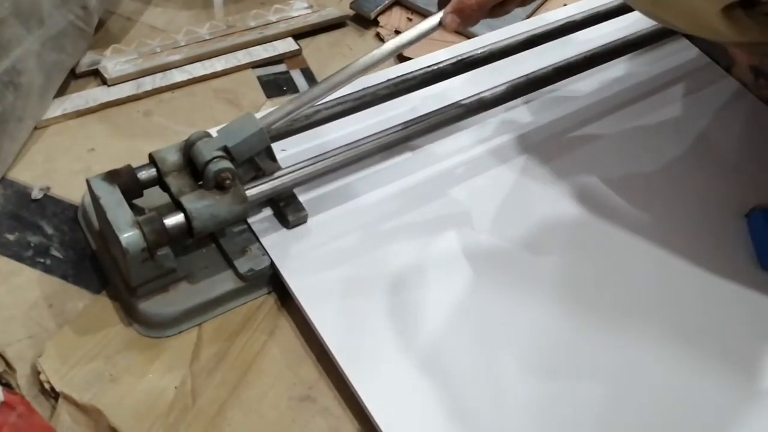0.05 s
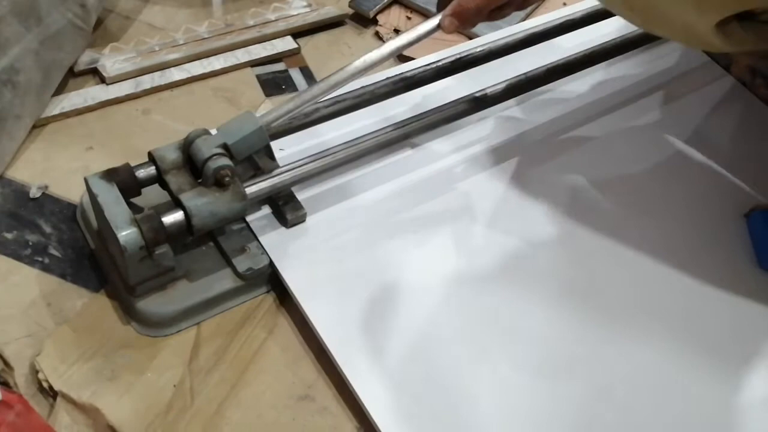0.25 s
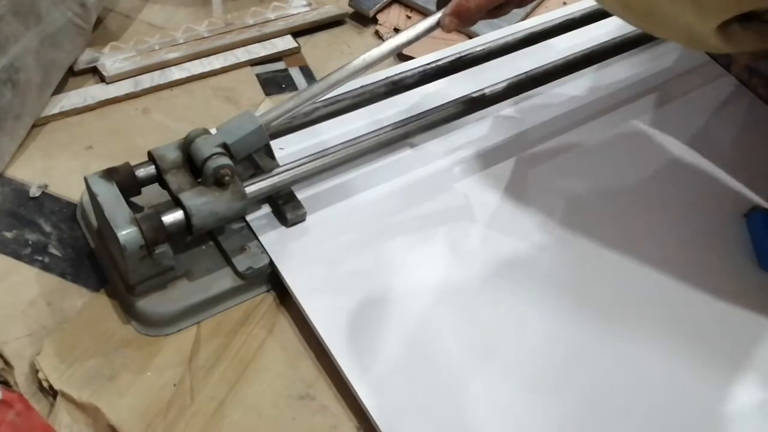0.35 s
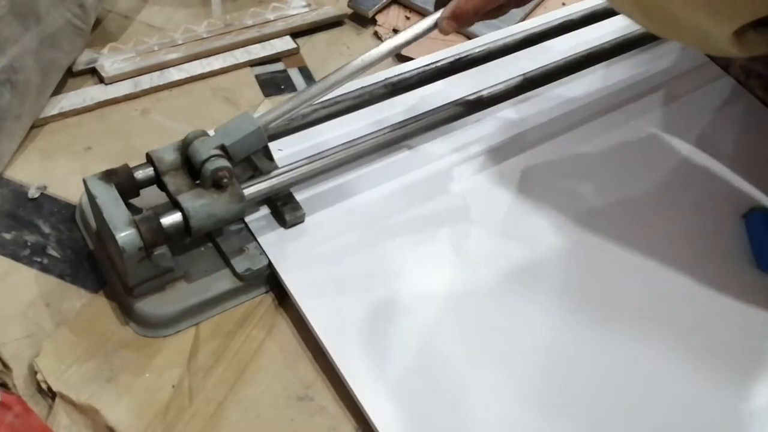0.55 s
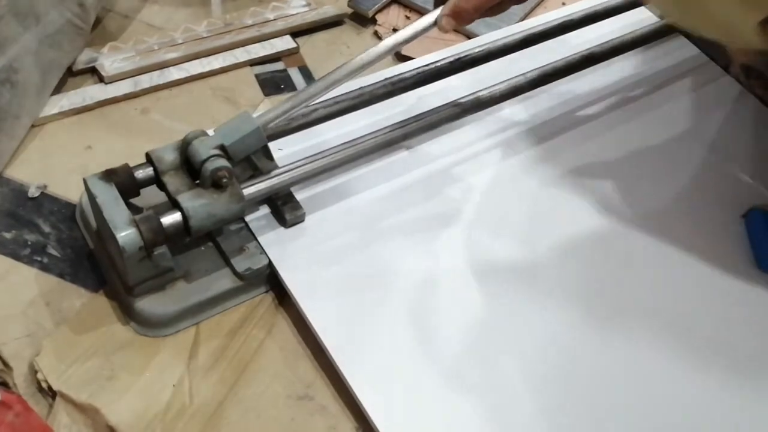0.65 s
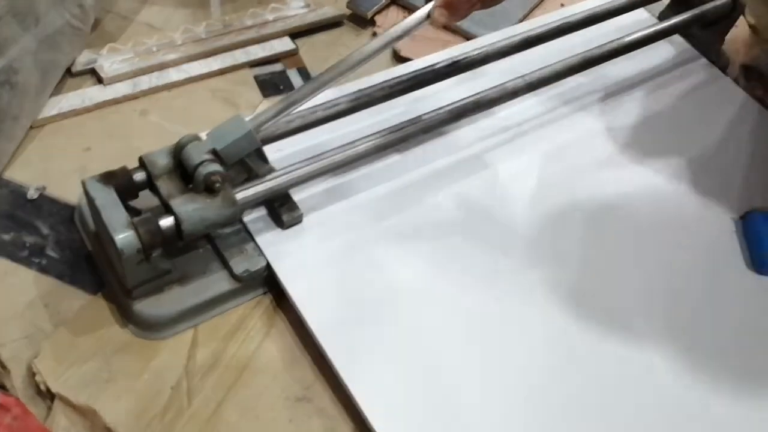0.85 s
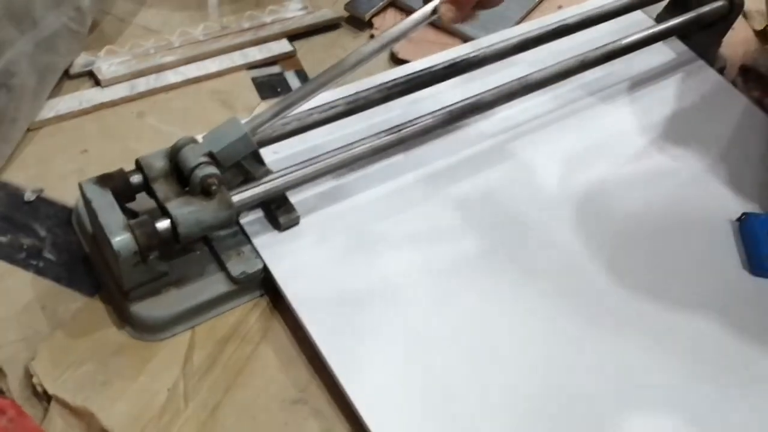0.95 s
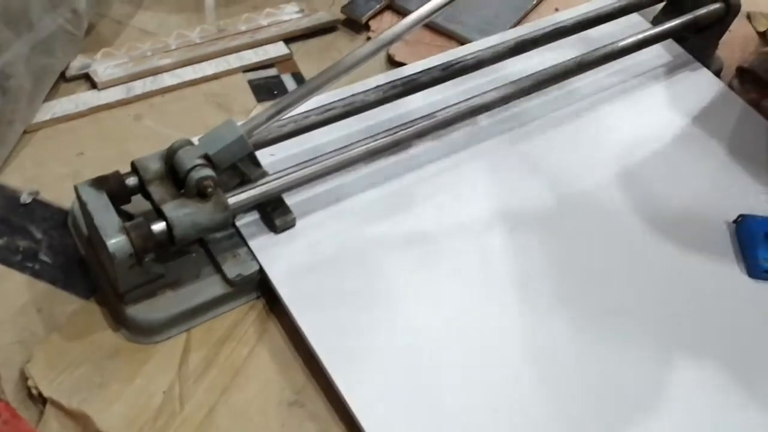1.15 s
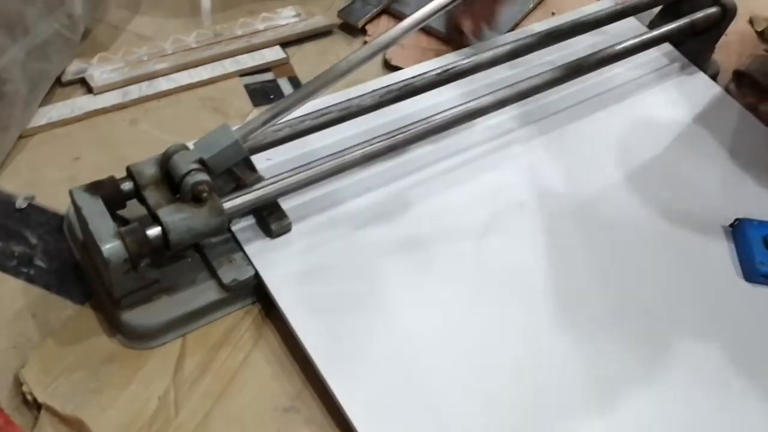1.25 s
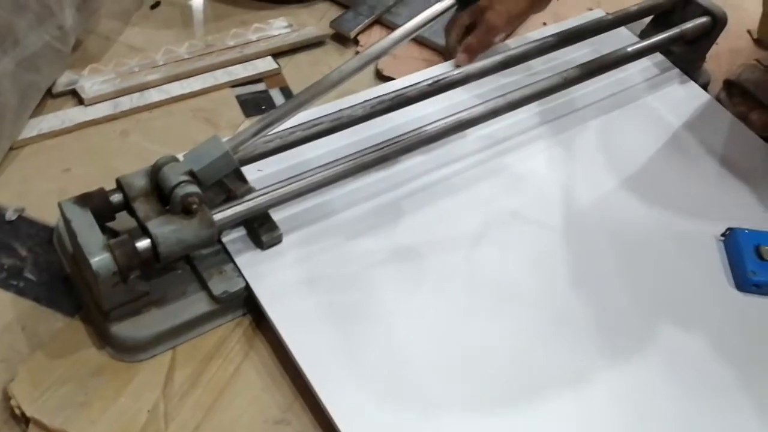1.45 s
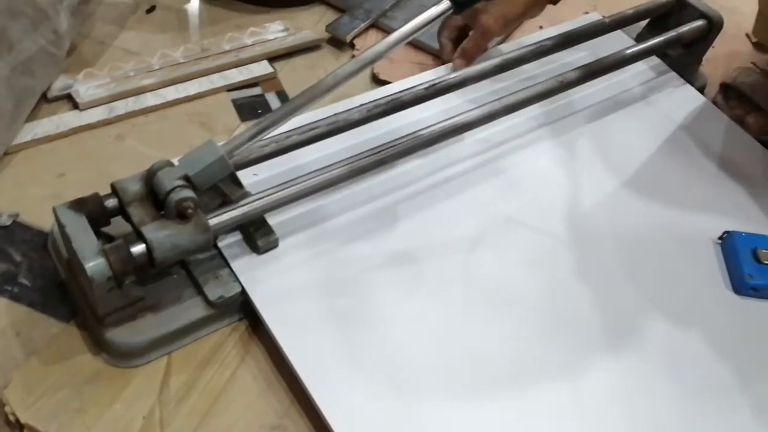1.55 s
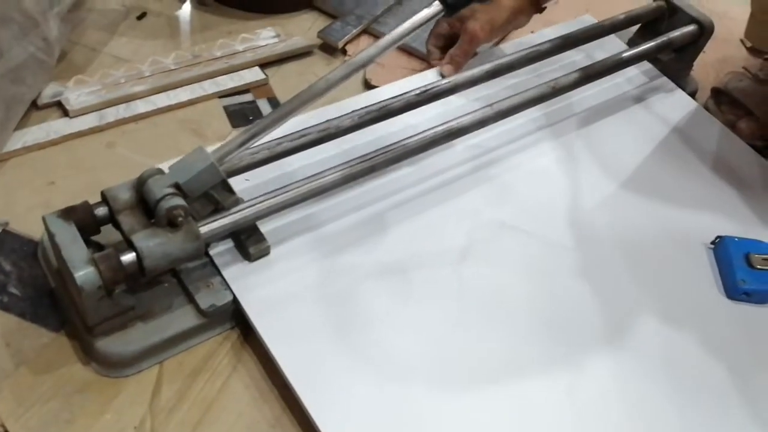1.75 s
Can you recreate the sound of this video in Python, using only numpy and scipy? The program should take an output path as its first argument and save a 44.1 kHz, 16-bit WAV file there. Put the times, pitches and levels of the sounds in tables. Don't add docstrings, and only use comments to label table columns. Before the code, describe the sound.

Close up, a manual tile cutter's handle clacks down with a short metallic ring, then the carriage scrapes and rattles along steel rails; the tile knocks, a distant tool clinks, in a small hissy room.

```python
import sys
import numpy as np
from scipy import signal
from scipy.fft import rfft, irfft, next_fast_len
from scipy.io import wavfile
from scipy.ndimage import uniform_filter1d

SR = 44100
rng = np.random.default_rng(int(sys.argv[2]) if len(sys.argv) > 2 else 0)


def generate_wav(signal):
    frames = np.transpose(np.atleast_2d(signal))
    scaled = np.clip(frames, -1, 1) * 32767
    pcm = np.round(scaled).astype(np.int16)
    wavfile.write(sys.argv[1], SR, pcm)


def invert_db(level):
    return 10 ** (np.asarray(level, dtype=float) / 20)


N = 79380
TIME = np.arange(N) / SR


def unit(x):
    return x / np.sqrt(np.mean(x ** 2) + 1e-20)


def noise():
    return rng.standard_normal((2, N))


def track(points):
    return np.interp(TIME, *np.transpose(points))


def along(points, hz):
    f, v = np.transpose(points)
    return np.interp(np.log(hz + 1), np.log(f + 1), v)


def filtered(x, response):
    m = 2 * next_fast_len(N // 2 + SR // 4)
    return irfft(rfft(x, m) * response(np.fft.rfftfreq(m, 1 / SR)), m)[..., :N]


def causal(points, hz):
    cepstrum = irfft(np.log(invert_db(along(points, hz))))
    cepstrum[1:len(hz) - 1] *= 2
    cepstrum[len(hz):] = 0
    return np.exp(rfft(cepstrum))


def body(peaks, ring_db, tone):
    def response(f):
        h = causal(tone, f)
        for k, (centre, width, db) in enumerate(peaks):
            resonance = 1j * f * width / (centre * centre - f * f + 1j * f * width)
            h = h + (-1) ** k * invert_db(db + ring_db) * resonance
        return h / np.sqrt(np.mean(abs(h) ** 2))
    return response


def burst(rows, lag=0):
    out, t = np.zeros(N + SR // 4), np.arange(SR // 4) / SR
    for s, db, t60, rise in rows:
        start = round(s * SR)
        out[start:start + len(t)] += (1 - np.exp(-t / (rise + lag))) * invert_db(db - 60 * t / t60)
    return out[:N]


def ring(modes, blows, rise):
    out = np.zeros(N)
    for s, blow_db in blows:
        t = np.maximum(TIME - s, 0)
        swell = 1 - np.exp(-t / rise)
        for hz, db, t60 in modes:
            out += swell * invert_db(db + blow_db - 60 * t / t60) * np.sin(2 * np.pi * hz * t)
    return out * np.array([[1], [.3]])


def ports(pair, alike):
    def mid_side(hz):
        turn = np.arccos(np.clip(along(alike, hz), -1, 1)) / 2
        return np.array([np.cos(turn), np.sin(turn)])
    mid, side = filtered(pair, mid_side)
    return np.array([mid + side, mid - side])


# (frequency [Hz], level [dB])
HISS_TONE = [(25, 2), (90, 4.5), (300, -3), (1200, -9), (4000, -4.5), (9500, -7), (13000, -16),
             (14800, -13)]
# (frequency [Hz], likeness [0-1])
HISS_ALIKE = [(60, 0.21), (300, 0.43), (640, 0.66), (1400, 0.0083)]
HISS_DB, HISS_PATCH_DB = -62, 4.5


def hiss():
    z = signal.stft(noise(), nperseg=512)[2]
    patches = uniform_filter1d(uniform_filter1d(rng.standard_normal(z.shape[1:]), 8, 0), 10, 1)
    pair = signal.istft(z * invert_db(HISS_PATCH_DB * unit(patches)), nperseg=512)[1][:, :N]
    coloured = filtered(pair, lambda hz: invert_db(along(HISS_TONE, hz)))
    return invert_db(HISS_DB) * unit(ports(coloured, HISS_ALIKE))


# (time [s], grit [dB], tile over grit [dB], bench over grit [dB])
SLIDE = [(0, -69.5, -0.5, -18), (.12, -69.5, -1.5, -1), (0.208, -53, -31, -25), (.235, -94, -29, -21),
         (0.268, -41.5, 6.5, 0), (0.498, -62, 10, 7), (0.561, -44.5, -7.5, -5.5), (0.681, -39.5, -2.5, -7),
         (0.714, -42, -14, -18), (0.852, -34, -13.5, -23.5), (0.936, -42, -5, -23), (1.07, -64.5, -2, -7.5),
         (1.13, -72.5, 12, 17.5), (1.3, -74, -1, 2.5), (1.649, -96.5, 30, 26.5), (1.718, -49.5, -1, -17),
         (1.762, -69.5, -5, -5), (1.8, -36.5, -10, -15.5)]


def sliding():
    s, grit_db, tile_db, bench_db = np.transpose(SLIDE)
    levels = [grit_db, grit_db + tile_db, grit_db + bench_db]
    return [invert_db(np.interp(TIME, s, db)) for db in levels]


def grit():
    grains_per_s, spread_db, share = 2500, 3, .6
    size = invert_db(spread_db * np.minimum(rng.exponential(1, N), 3))
    grains = (rng.random(N) < grains_per_s / SR) * size * noise()
    return unit(share * unit(grains) + (1 - share) * noise())


# (time [s], level [dB], t60 [s], rise [s])
CHATTER = [(.1825, -67, 0.028, .0005), (.195, -54, 0.013, 0.00035), (.5162, -38.5, 0.018, 0.00084),
           (.5287, -39.5, 0.033, 0.00036), (.5487, -34, 0.068, 0.00039), (.7172, -26.5, 0.027, 0.00022),
           (.7293, -21.5, 0.016, 0.00084), (.7322, -29, 0.008, 0.00046), (.7428, -25, 0.094, 0.00036),
           (.753, -29.5, 0.042, 0.00031), (.779, -35.5, 0.077, 0.0005), (.786, -28.5, 0.032, 0.00071),
           (.7931, -26, 0.14, 0.00015), (.804, -33, 0.027, 0.00096), (.812, -28, 0.06, 0.0011),
           (.818, -36, 0.036, 0.00052), (.9722, -39.5, 0.073, 0.00062), (1.6556, -44.5, 0.016, 0.00039),
           (1.6716, -41, 0.11, 0.00015), (1.763, -40, .1, 0.0021), (1.7734, -36, 0.055, 0.0037),
           (1.786, -34, 0.13, 0.0038)]
# (time [s], steel [dB], tile over steel [dB], bench over steel [dB], t60 [s])
KNOCKS = [
    (0.2328, -20, -14, -10, 0.08),
    (0.5658, -37, 3, 2, 0.053),
    (0.6235, -34, -2, -2, 0.053),
    (1.095, -64, 16, 26, 0.08),
    (1.1052, -52, 5, -5, 0.12),
    (1.6965, -35, 1, -29, 0.04),
    (1.711, -40, -10, -25, 0.028),
]
KNOCK_RISE_S, CHATTER_TILE_DB = 0.00035, -12.5
TILE_LAG_S, BENCH_LAG_S = 0.00034, 0.0037


def contacts():
    steel = burst(CHATTER + [(s, db, t60, KNOCK_RISE_S) for s, db, _, _, t60 in KNOCKS])
    tile_knocks = burst([(s, db + up, t60, 0) for s, db, up, _, t60 in KNOCKS], TILE_LAG_S)
    tile_chatter = invert_db(CHATTER_TILE_DB) * burst(CHATTER, TILE_LAG_S)
    bench_knocks = burst([(s, db + up, t60, 0) for s, db, _, up, t60 in KNOCKS], BENCH_LAG_S)
    return steel, tile_knocks + tile_chatter, bench_knocks


# (frequency [Hz], width [Hz], level [dB])
RAILS_NEAR = [(1174, 15, -3.5), (2020, 20, -5), (2830, 87, -3), (3288, 51, 3), (4880, 150, -13.5),
              (5350, 145, -3), (5800, 30, -7), (6850, 80, -1.5), (7070, 63, -13), (8600, 53, -29),
              (8880, 52, -4), (10100, 55, -1)]
RAILS_MID = [(720, 52, -7), (1980, 50, -17), (2503, 25, -4), (3317, 66, 4.5), (4140, 69, -11),
             (4860, 23, -1), (5500, 380, -13.5), (6315, 61, 0.5), (6590, 22, -3.5), (7300, 130, -0.5),
             (8020, 37, -22), (8700, 113, 4), (9680, 370, -11), (10350, 34, -24)]
RAILS_FAR = [(746, 36, -10), (1159, 34, 1.5), (2760, 26, 7), (4240, 71, -4.5), (5343, 77, -0.5),
             (6260, 70, 2), (6570, 57, -9), (6630, 53, -1), (8210, 43, -22), (8570, 105, -1),
             (9350, 46, -6), (9900, 43, 1)]
# (frequency [Hz], level [dB])
STEEL_TONE = [(300, -30.5), (900, -9.5), (1450, -6), (2500, 1.5), (4000, -5.5), (9500, -0.5), (12500, -7.5),
              (15000, -10)]
# (time [s], place [0 near, 1 mid, 2 far])
TRAVEL = [(.7, 0), (.73, 1), (.835, 1), (.865, 2), (1.3, 2), (1.5, 1)]
RAIL_RING_DB = 8.5


def rails(shake):
    place, out = track(TRAVEL), 0
    for k, peaks in enumerate([RAILS_NEAR, RAILS_MID, RAILS_FAR]):
        share = np.maximum(1 - abs(place - k), 0)
        out = out + filtered(share * shake, body(peaks, RAIL_RING_DB, STEEL_TONE))
    return out


# (frequency [Hz], width [Hz], level [dB])
TILE = [(556.7, 30.6, 2.5), (653, 60, -1.5), (871, 52, -19), (1094, 51, -2.5), (1193, 108, -1.5),
        (1707, 50, -2), (1970, 153, -8.5), (2594, 16, -2.5)]
# (frequency [Hz], level [dB])
TILE_TONE = [(200, -52.5), (450, -25), (700, -5.5), (1100, -14), (1450, -36), (2500, -15.5), (6000, -28),
             (8000, -70)]


def tile(shake):
    return filtered(shake, body(TILE, -5, TILE_TONE))


# (frequency [Hz], width [Hz], level [dB])
BENCH = [(116, 28, -23.5), (214, 10, -10), (282.5, 76, 0.5), (314, 5.4, 3.5), (363, 36, -6.5),
         (442, 17, -9)]
# (frequency [Hz], level [dB])
BENCH_TONE = [(20, -38), (60, -32), (150, -22), (300, -10), (500, -12), (900, -45)]


def bench(shake):
    return filtered(shake, body(BENCH, -4.5, BENCH_TONE))


def cutter():
    rail_slide, tile_slide, bench_slide = sliding()
    rail_hits, tile_hits, bench_hits = contacts()
    on_rails = rails(rail_slide * grit() + rail_hits * noise())
    on_tile = tile(tile_slide * grit() + tile_hits * noise())
    return on_rails + on_tile + bench((bench_slide + bench_hits) * noise())


# (offset [s], level [dB])
TICK_GROUP = [
    (-.0065, -1),
    (0, 1),
    (.0045, -1),
]
# (time [s], level [dB])
EXTRA_TICKS = [(0.0177, 16.5), (.019, 10), (.040, 9.5), (.042, 4), (.045, 6), (1.299, 2), (1.323, 3),
               (1.328, 0), (1.403, 12), (1.447, 11.5)]
# (frequency [Hz], level [dB])
TICK_TONE = [(4000, -30), (6000, -12), (9000, -1), (13000, -2), (15500, -8)]
TICK_S, TICK_PERIOD_S, TICK_DB, TICK_T60_S, TICK_RISE_S = .0045, .08, -51, .006, .0004


def ticks():
    steady = [(TICK_S + TICK_PERIOD_S * k + offset, db) for k in range(23) for offset, db in TICK_GROUP]
    rows = [(s, TICK_DB + db, TICK_T60_S, TICK_RISE_S) for s, db in steady + EXTRA_TICKS if 0 < s < N / SR]
    tick = filtered(burst(rows) * rng.standard_normal(N), lambda f: causal(TICK_TONE, f))
    return tick * np.array([[2], [1]])


# (time [s], level [dB])
RUMBLE = [(.22, -80), (0.249, -46.5), (.4, -62.5), (.47, -53.5), (.55, -60), (.7, -72), (.76, -87)]
# (frequency [Hz], level [dB])
RUMBLE_TONE = [(15, -30), (35, -16), (65, -13), (110, -7), (170, -10), (300, -60)]


def rumble():
    low = unit(filtered(rng.standard_normal(N), lambda f: invert_db(along(RUMBLE_TONE, f))))
    return invert_db(track(RUMBLE)) * low


# (time [s], level [dB], t60 [s], rise [s])
CRACK = (.2328, -13, .008, .0004)
# (frequency [Hz], level [dB])
CRACK_TONE = [(500, -18), (3000, -8), (5300, -1), (7000, -12), (15000, -16)]


def crack():
    return filtered(burst([CRACK]) * noise(), lambda f: causal(CRACK_TONE, f))


# (frequency [Hz], peak [dB], t60 [s])
BED = [(305, -19, .12), (532, -13, .09), (562, -13, .09), (1015, -23, .08), (1130, -13, .05),
       (1195, -11, .045), (1640, -19, .08), (2030, -24, .07), (2090, -26, .07), (2535, -27, .07),
       (3160, -26, .07), (5590, -26, .08)]
# (frequency [Hz], peak [dB], t60 [s])
FRAME = [(181.7, -39.5, 0.97), (547.5, -37.5, 0.75), (1006, -42, 1)]
# (frequency [Hz], peak [dB], t60 [s])
HANDLE = [(5280, -11, .014)]


def bed():
    blow = [(CRACK[0], 0)]
    return ring(BED + FRAME, blow, .005) + ring(HANDLE, blow, .0007)


JOLT_RISE_S = 0.0011
# (frequency [Hz], peak [dB], t60 [s])
TILE_DROP = [(213, -41, .14), (275, -43, .12), (525, -36, .12), (640, -35, .12), (1188, -47, .1)]
# (time [s], level [dB])
TILE_DROPS = [
    (0.5675, 1.5),
    (.577, -13),
    (1.0963, -11.5),
    (1.1, -0.5),
    (1.1068, -2.5),
]


def loose_tile():
    return ring(TILE_DROP, TILE_DROPS, JOLT_RISE_S)


# (frequency [Hz], peak [dB], t60 [s])
CARRIAGE = [(2537, -34, 0.054), (3384, -45, 0.16), (3286, -38, 0.088), (5640, -51, 0.19), (6087, -43.5, .1),
            (8646, -45, 0.066), (9342, -46, 0.067), (9970, -50, 0.19)]
# (time [s], level [dB])
CARRIAGE_JOLTS = [
    (1.06, -11),
    (1.1045, 1.5),
    (0.88, 8),
]


def carriage():
    return ring(CARRIAGE, CARRIAGE_JOLTS, JOLT_RISE_S)


# (frequency [Hz], level [dB], build-up [s], t60 [s])
CLINK = [(700, -56, .03, .06), (781, -49, .025, .07), (947, -50, .012, .05), (1000, -54, .02, .05),
         (1287, -53, .01, .09), (1547, -53, .02, .14), (1736, -50, .002, .24), (2056, -60, .01, .1),
         (2313, -62, .015, .08), (3010, -60, .002, .05), (3126, -50, .001, .07), (3195, -54, .001, .06),
         (4490, -52, .001, .04)]
CLINK_S, CLINK_HOLD_S, CLINK_ROUGH, CLINK_ROUGH_S = 1.3365, .042, 1.1, .004


def clink():
    t = np.maximum(TIME - CLINK_S, 0)
    out = np.zeros((2, N))
    for hz, db, late, t60 in CLINK:
        hold = CLINK_HOLD_S * (hz < 4000) + late
        push = (1 - np.exp(-t / late)) * invert_db(db - 60 * np.maximum(t - hold, 0) / t60)
        tremble = unit(filtered(noise(), lambda f: np.exp(-(f * CLINK_ROUGH_S * 2) ** 2)))
        rough = CLINK_ROUGH * min(1, 900 / hz) ** .5
        out += push * (1 + rough * tremble) * np.sin(2 * np.pi * (hz * t + rng.random((2, 1))))
    return out


# (frequency [Hz], t60 [s])
ROOM = [(150, 0.24), (1000, 0.42), (4000, 0.16), (12000, 0.16)]
ROOM_DB = -9.5


def room(x):
    hz, t, z = signal.stft(rng.standard_normal((2, SR // 2)), SR, nperseg=256)
    tail = signal.istft(z * invert_db(-60 * t / along(ROOM, hz)[:, None]), SR, nperseg=256)[1]
    tail = np.pad(tail, ((0, 0), (SR // 200, 0))) / np.linalg.norm(tail[0])
    return x + invert_db(ROOM_DB) * signal.fftconvolve(x, tail, axes=1)[:, :N]


# (time [s], left over right [dB])
LEFTWARD = [(0, -4.5), (.25, -1.5), (.55, 1.5), (.8, 3.5), (1.2, 1.5), (1.65, -7.5), (1.8, -2.5)]
# (frequency [Hz], likeness [0-1])
ALIKE = [(100, 0.87), (400, 0.56), (900, 0.75), (2000, 0.063), (15000, 0.059)]
RING_DRY = .7
LEFT_LAG_S = 0.00016


def scene():
    rings = bed() + loose_tile() + carriage() + clink()
    roomy = room(cutter() + crack() + (1 - RING_DRY) * rings)
    side = invert_db(track(LEFTWARD) * np.array([[.5], [-.5]]))
    near = side * ports(roomy + RING_DRY * rings, ALIKE)
    lag = np.array([[LEFT_LAG_S / 2], [-LEFT_LAG_S / 2]])
    lagged = filtered(near, lambda f: np.exp(-2j * np.pi * f * lag))
    return lagged + ticks() + hiss() + rumble()


def top_cut(x):
    return signal.sosfilt(signal.butter(12, 16500, fs=SR, output="sos"), x)


# (frequency [Hz], gain [dB])
RIGHT_PORT = [(100, -7), (3700, -8), (4600, 3), (5500, 10), (6500, -1), (8500, -17), (13000, -11),
              (14800, -4)]
TOP_HZ = 15400


def record(dry):
    def microphones(f):
        return np.array([np.ones(len(f)), causal(RIGHT_PORT, f)]) * (f < TOP_HZ)
    return top_cut(filtered(dry, microphones))


dry = scene()
out = record(dry)
generate_wav(out)
```